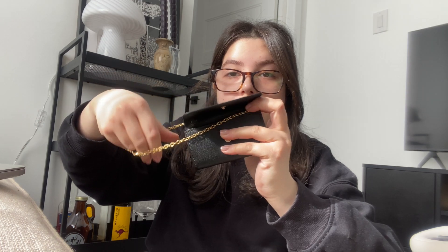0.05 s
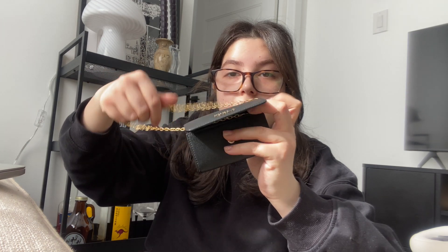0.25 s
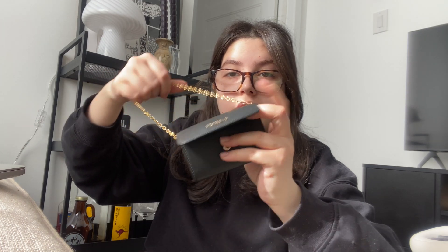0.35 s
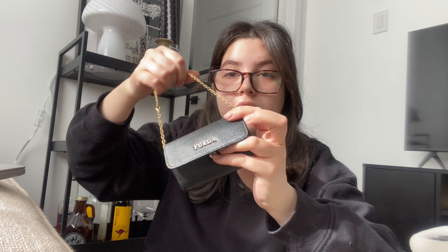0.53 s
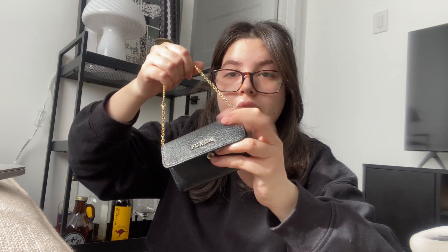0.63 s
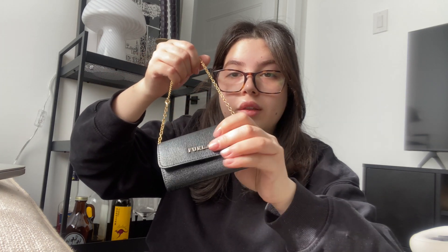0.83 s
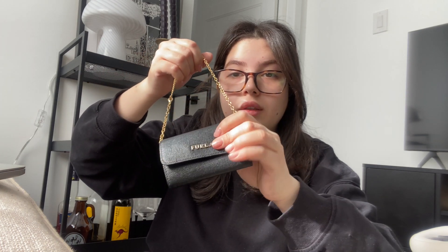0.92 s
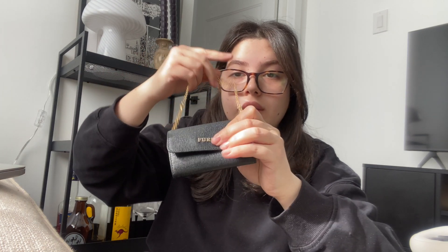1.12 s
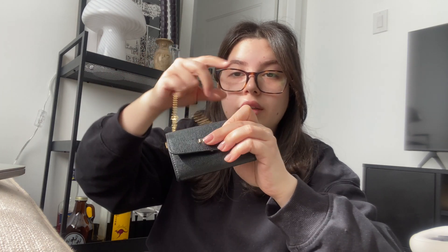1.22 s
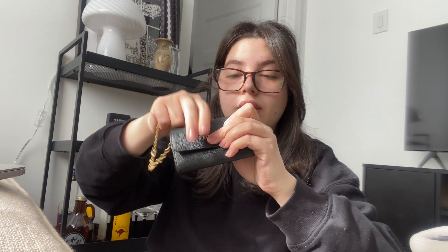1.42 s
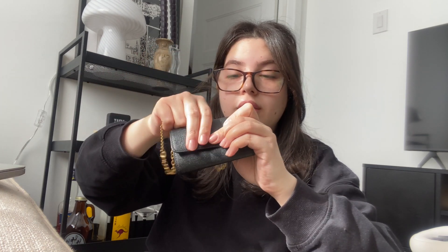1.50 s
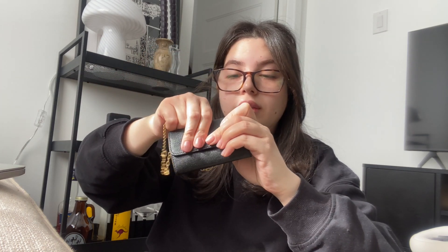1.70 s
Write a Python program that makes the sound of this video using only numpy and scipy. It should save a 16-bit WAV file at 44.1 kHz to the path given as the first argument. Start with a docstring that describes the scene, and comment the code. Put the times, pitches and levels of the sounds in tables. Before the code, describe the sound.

A small leather purse with a thin chain is handled up close, snapping twice amid light clinks

```python
"""A thin chain is pulled through a small leather wallet close to a stereo microphone pair in a quiet room.
Links knock and tick on stiff leather and a clasp snaps twice: blows and noisy scrapes ring short resonances.
Between the knocks the chain rustles, as noise shaped by many tiny contacts; dull thuds come from the hand.
The wallet rings narrowly, the room answers briefly with fading noise, and a low, unsteady rumble lies under hiss."""
import sys
import numpy as np
from scipy import signal
from scipy.fft import rfft, irfft, next_fast_len
from scipy.io import wavfile

SR = 44100
rng = np.random.default_rng(int(sys.argv[2]) if len(sys.argv) > 2 else 0)


def transcribe(signal):
    """Save signal, clipped to [-1, 1], as a 16-bit WAV file at the path in sys.argv[1]."""
    frames = np.atleast_2d(signal).T
    limited = np.clip(frames, -1, 1)
    pcm = np.round(limited * 32767).astype(np.int16)
    wavfile.write(sys.argv[1], SR, pcm)


N = 77175
SIDES = np.array([[.5], [-.5]])  # half of each left-right difference goes to either side


def amp(db):
    """dB to gain."""
    return 10 ** (np.asarray(db) / 20)


def unit(x):
    """Scaled to rms 1."""
    return x / np.sqrt(np.mean(x ** 2) + 1e-20)


def peaked(x):
    """Scaled to a peak of 1."""
    return x / abs(x).max()


def along(points, hz):
    """Values of (Hz, value) points, read on a log frequency axis."""
    f, v = np.transpose(points)
    return np.interp(np.log(hz + 1), np.log(f + 1), v)


def over_time(points):
    """Values of (s, value) points at every sample."""
    return np.interp(np.arange(N) / SR, *np.transpose(points))


def filtered(x, response, size=N):
    """x times a complex response of frequency."""
    m = next_fast_len(2 * size)
    return irfft(rfft(x, m) * response(np.fft.rfftfreq(m, 1 / SR)), m)[..., :size]


def causal(points):
    """Minimum-phase impulse response of a (Hz, dB) colour, by folding its cepstrum."""
    size = 2 ** 10
    cepstrum = irfft(np.log(amp(along(points, np.fft.rfftfreq(size, 1 / SR)))), size)
    cepstrum[1:size // 2] *= 2
    cepstrum[size // 2 + 1:] = 0
    return irfft(np.exp(rfft(cepstrum)), size)[:size // 2]


def resonance(f, hz, q):
    """Response of one damped resonance."""
    return 1j * f * hz / q / (hz * hz - f * f + 1j * f * hz / q)


def hiss():
    """Microphone hiss over an unsteady room rumble: noise whose left-right likeness falls with frequency."""
    # colour of the floor: hz, relative level_db
    floor_colour = [(20, -16.5), (40, -0.5), (65, 5.5), (110, -8.5), (300, -17), (700, -23), (1150, -28.5),
                    (1500, -31), (2000, -34), (5000, -32.5), (9000, -41), (15000, -44.5), (15500, -59.5),
                    (15750, -106.5)]
    # likeness of left and right: hz, correlation
    likeness = [(60, 0.62), (1500, 0.1), (3000, 0.033)]
    # level of the unsteady rumble, used around its mean: time_s, level_db
    rumble_level = [(0.0, -52.5), (0.18, -63), (0.57, -55), (0.594, -67.5), (0.808, -54.5), (0.954, -67.5),
                    (1.09, -57), (1.7, -60.5), (1.75, -66.5)]
    floor_db, rumble_top_hz = -56.5, 110

    def mid_and_side(hz):
        turn = np.arccos(np.clip(along(likeness, hz), -1, 1)) / 2
        return amp(along(floor_colour, hz)) * [np.cos(turn), np.sin(turn)]

    mid, side = filtered(rng.standard_normal((2, N)), mid_and_side)
    floor = amp(floor_db) * unit(np.array([mid + side, mid - side]))
    rumble = filtered(floor, lambda hz: hz < rumble_top_hz)
    level_db = over_time(rumble_level)
    return floor - rumble + amp(level_db - level_db.mean()) * rumble


def room(x):
    """Each frequency of the room's answer dies at its own speed; each stretch gets a newly drawn noise tail."""
    # reverberation time: hz, t60_s
    fade_times = [(200, 0.28), (1000, 0.26), (3000, 0.22), (8000, 0.28), (15000, 0.17)]
    stretch_s, delay_s = .09, 0.0046
    step, delay = round(stretch_s * SR), round(delay_s * SR)
    out = np.zeros((2, N + SR))
    for start in range(0, N, step):
        noise = rng.standard_normal((2, SR // 3))
        hz, t, spectrum = signal.stft(noise, SR, nperseg=256)
        fade = amp(-60 * t / along(fade_times, hz)[:, None])
        tail = signal.istft(spectrum * fade, SR, nperseg=256)[1]
        tail /= np.linalg.norm(tail[0])
        wet = signal.fftconvolve(x[None, start:start + step], tail, axes=1)
        out[:, start + delay:][:, :wet.shape[1]] += wet
    return out[:, :N]


def thuds():
    """The wallet in the hand: a blow and a short rough push into a well-damped low resonance."""
    # dull thuds, peaks before the stereo balance: start_s, peak_db, pitch_hz
    thud_list = [(0.233, -39, 490), (0.3582, -36.5, 440), (0.37, -41.5, 250), (0.3874, -34, 510),
                 (0.479, -51.5, 350), (0.784, -30, 417), (.78, -36, 109), (1.087, -44.5, 586),
                 (1.357, -38.5, 587), (1.376, -41.5, 420)]
    sharpness_q, push_fall_ms, blow = 1.15, 13, 16.6
    size = 4096
    out = np.zeros(N + size)
    fall = np.exp(-np.arange(size) / (push_fall_ms * SR / 1000))
    for s, db, hz in thud_list:
        push = fall * rng.standard_normal(size)
        push[0] = blow
        # the resonance, dulled above twice its pitch
        body = lambda f: resonance(f, hz, sharpness_q) / (1 + 1j * f / (2 * hz))
        out[round(s * SR):][:size] += amp(db) * peaked(filtered(push, body, size=size))
    return out[:N]


def rustle():
    """The chain sliding over the leather: many tiny link contacts of uneven size over a smooth rub."""
    # sliding, levels before ring and stereo balance: time_s, body_level_db, treble_level_db
    slide = [(0, -53, -74), (0.062, -84, -85.5), (0.16, -52, -66), (.2, -43.5, -60), (.28, -61.5, -76),
             (0.352, -52, -72.5), (.45, -57.5, -63.5), (.48, -43, -55.5), (.53, -55, -67.5),
             (.56, -70, -98), (0.65, -68.5, -78.5), (0.683, -52, -51), (.71, -68, -59), (0.748, -57, -64),
             (0.78, -37, -45), (.8, -49, -60), (0.921, -70.5, -75.5), (1.019, -83.5, -74.5),
             (1.09, -57, -69), (1.12, -57.5, -70.5), (1.251, -62.5, -67), (1.28, -75, -81),
             (1.329, -66.5, -75.5), (1.369, -39.5, -59.5), (1.439, -60, -80), (1.478, -52.5, -57.5),
             (1.52, -68.5, -73), (1.592, -55.5, -75), (1.66, -75.5, -77.5)]
    # colour of the leather body: hz, relative level_db
    body_colour = [(350, -9.5), (700, -15.5), (1200, -5), (1600, 2.5), (2200, -3), (3000, -2),
                   (5000, -12.5), (9000, -36.5)]
    # colour of the treble: hz, relative level_db
    treble_colour = [(2000, -61.5), (3500, -15.5), (6000, 17.5), (8000, 13.5), (11000, 15), (15300, 12.5),
                     (16200, -20)]
    grains_per_s, mean_boost_db, grain_fall_ms, smooth_db = 730, 4.5, 8, -5
    shut_s, shut_pitch = 1.28, 0.76  # pressed shut, the leather rustles lower

    sizes = amp(mean_boost_db * rng.exponential(size=N))
    hits = (rng.random(N) < grains_per_s / SR) * sizes
    grain = np.exp(-np.arange(256) / (grain_fall_ms * SR / 1000))  # cut off after 256 samples
    contact = unit(np.convolve(hits, grain)[:N]) + amp(smooth_db)

    def rubbed(colour):
        return unit(np.convolve(contact * rng.standard_normal(N), causal(colour))[:N])

    open_body = rubbed(body_colour)
    shut_body = rubbed(np.multiply(body_colour, [shut_pitch, 1]))
    body = np.where(np.arange(N) / SR < shut_s, open_body, shut_body)
    s, body_db, treble_db = np.transpose(slide)
    body_gain = amp(over_time(np.transpose([s, body_db])))
    treble_gain = amp(over_time(np.transpose([s, treble_db])))
    return body_gain * body + treble_gain * rubbed(treble_colour)


def taps():
    """Clean taps of single links: an impulse through two equal damped resonances in a row."""
    # taps, peaks before ring and stereo balance: start_s, peak_db, pitch_hz
    tap_list = [(.01, -40.5, 1820), (0.181, -38.5, 1450), (.187, -39, 1710), (0.2109, -29.5, 1380),
                (0.2139, -32, 1800), (0.2328, -28.5, 1400), (.261, -37.5, 1600), (0.325, -37, 1800),
                (0.3555, -43, 850), (.357, -32.5, 1450), (0.3915, -6.5, 1650), (0.738, -45.5, 1551),
                (0.7847, -18.5, 1617), (.913, -51.5, 1516), (1.0298, -53.5, 1586), (1.036, -39.5, 1656),
                (1.0587, -48, 1590), (1.074, -51, 1480), (1.081, -38, 1920), (1.09, -36, 1400),
                (1.095, -38.5, 1570), (1.3458, -38, 990), (1.3566, -21.5, 1314), (1.365, -30, 1900),
                (1.368, -38, 1140), (1.376, -30, 1360), (1.379, -35, 1630), (1.383, -38, 1105),
                (1.3867, -35, 1200), (1.394, -40, 1150), (1.547, -41.5, 1260), (1.5755, -47, 1800),
                (1.587, -44, 1070), (1.593, -44.5, 2200)]
    sharpness_q, size = 3.07, 2048
    out = np.zeros(N + size)
    for s, db, hz in tap_list:
        tap = filtered(signal.unit_impulse(size), lambda f: resonance(f, hz, sharpness_q) ** 2, size=size)
        out[round(s * SR):][:size] += amp(db) * peaked(tap)
    return out[:N]


def scrape(length_ms, tail_ms, blow, size):
    """A blow, then a rough contact that holds for its length and dies; long scrapes start softer."""
    ms = np.arange(size) * 1000 / SR
    force = np.exp(-np.maximum(ms - length_ms, 0) / tail_ms) * rng.standard_normal(size)
    force[0] = blow / max(length_ms, .5)
    return force


def knocks():
    """Each link contact rings the leather at its own pitch, with upper leather, hard edge and metal sparkle."""
    # knocks and ticks, peaks of each part before ring and stereo balance:
    # start_s, leather_db, leather_pitch_hz, upper_leather_db, hard_edge_db, metal_sparkle_db, scrape_ms
    knock_list = [(0.083, -53, 2410, -41, -57, -80, 0.39), (0.172, -34, 1900, -39, -46, -67, 4.1),
                  (0.19, -31, 1457, -33, -45, -63, 1.03), (0.2305, -18.5, 2085, -25.5, -28, -47, 1.23),
                  (0.2438, -30.5, 2090, -47, -38.5, -63, 0.39), (0.3648, -26.5, 2080, -48, -54, -44, 2.8),
                  (0.3839, -21.5, 1740, -33, -33, -30, 1.1), (0.388, -6.5, 2660, -37, -16, -30, 0.18),
                  (0.3884, -15, 1355, -18, -49, -36, 3.22), (0.4082, -32, 1800, -39, -37, -50, 1.9),
                  (0.476, -30, 1880, -36, -39.5, -37, 4.5), (0.4831, -40, 1650, -31, -41, -39, 2.5),
                  (0.5053, -30.5, 1860, -35, -56, -49, 0.73), (0.519, -38, 1730, -44, -49, -42, 1.8),
                  (0.68, -34.5, 1980, -31, -47, -38, 0.64), (0.6847, -32.5, 2030, -31, -33.5, -22, 7.14),
                  (0.779, -23, 1950, -22.5, -22, -30, 1.1), (0.7826, -16, 1676, -10, -8, -18, 1.08),
                  (0.798, -31, 1520, -55, -53, -36.5, 5.6), (1.0827, -34, 1520, -36.5, -39, -71, 3),
                  (1.092, -42, 1900, -40, -42.5, -81, 2.4), (1.128, -39.5, 1650, -59, -35, -75, 0.84),
                  (1.158, -52, 1470, -71, -41, -70, 2.7), (1.186, -53, 1530, -49, -46, -63, 2.5),
                  (1.197, -53, 1520, -67, -45, -73, 1.3), (1.2236, -48.5, 1336, -45, -34.5, -31, 1.3),
                  (1.237, -49, 1320, -36, -32, -54, 0.45), (1.242, -57, 1250, -49, -42, -43.5, 2),
                  (1.3556, -28.5, 2400, -28.5, -37, -45, 2.8), (1.3721, -25, 2140, -55, -40, -68, 3.4),
                  (1.451, -48.5, 1220, -66, -53, -49.5, 4.2), (1.474, -56, 1230, -45, -71, -60, 9),
                  (1.48, -43.5, 1057, -41, -43, -44.5, 5.9), (1.551, -50, 1740, -45.5, -47.5, -55, 1.04),
                  (1.584, -38, 1970, -44.5, -75.5, -76, 4.1)]
    # colour of the upper leather: hz, relative level_db
    upper_colour = [(1200, -20), (2200, -6), (2750, -2.5), (4400, -2), (6000, -34)]
    # colour of the hard edge: hz, relative level_db
    edge_colour = [(2500, -28), (4600, 10.5), (6300, 6.5), (7800, -3), (8700, 8.5), (11000, -21.5)]
    # colour of the metal sparkle: hz, relative level_db
    sparkle_colour = [(7000, -65), (9500, -14), (11500, -5), (13500, -12.5), (15400, -6.5), (16900, -13)]
    leather_q, size = 1.66, 2048
    out = np.zeros(N + size)
    upper, edge, sparkle = causal(upper_colour), causal(edge_colour), causal(sparkle_colour)
    for s, leather_db, hz, upper_db, edge_db, sparkle_db, ms in knock_list:
        soft = scrape(ms, tail_ms=0.93, blow=4.3, size=size)
        hard = scrape(ms, tail_ms=1, blow=11.1, size=size)  # drives both upper leather and edge
        metal = scrape(ms, tail_ms=1, blow=1.4, size=size)
        leather = filtered(soft, lambda f: resonance(f, hz, leather_q) ** 2, size=size)
        sound = amp(leather_db) * peaked(leather)
        sound += amp(upper_db) * peaked(np.convolve(hard, upper)[:size])
        sound += amp(edge_db) * peaked(np.convolve(hard, edge)[:size])
        sound += amp(sparkle_db) * peaked(np.convolve(metal, sparkle)[:size])
        out[round(s * SR):][:size] += sound
    return out[:N]


def hollow(x):
    """The contacts plus the narrow ring they set off in the hollow wallet."""
    # how freely it rings in the grip: time_s, gain_db
    grip = [(0.419, -34), (.6, 13.5), (0.781, -8), (1, 8), (1.2, -0.5), (1.28, -43)]
    ring_hz, ring_q = 1520, 17.7
    ring = filtered(amp(over_time(grip)) * x, lambda hz: resonance(hz, ring_hz, ring_q))
    return x + ring


def scene():
    """The close wallet reaches the left microphone a little earlier; room and floor surround it."""
    # stereo balance of the wallet: hz, left_over_right_db
    balance = [(60, -8.5), (300, 7.5), (1500, 0), (3000, 2.5), (5500, 4.6), (7800, -4)]
    lead_s, late_lead_s, moves_s = 0.00014, 0.00011, .62  # the left lead shrinks once the wallet moves
    room_db = -13.5
    near = hollow(knocks() + taps() + rustle()) + thuds()

    def at_pair(lead):
        level = lambda hz: amp(SIDES * along(balance, hz))
        return filtered(near, lambda hz: level(hz) * np.exp(2j * np.pi * hz * lead * SIDES))

    direct = np.where(np.arange(N) < moves_s * SR, at_pair(lead_s), at_pair(late_lead_s))
    return direct + amp(room_db) * room(near) + hiss()


def record(dry):
    """Two channels below the top treble, the left signal turned in phase for both above it, then a band limit."""
    # phase turn between the sides in the top treble: hz, left_lead_radians
    treble_turn = [(9000, 3.3), (9900, 4), (11000, 0), (13000, 1.05), (14200, -5.5), (15800, -2)]
    # the microphone's top end: hz, gain_db
    roll_off = [(15600, 0), (16000, -10), (16700, -18), (17000, -55)]
    shared_hz, shared_width_hz, top_hz = 8300, 180, 17100
    shared = lambda hz: (1 + np.tanh((hz - shared_hz) / shared_width_hz)) / 2
    low = filtered(dry, lambda hz: 1 - shared(hz))
    top = filtered(dry[0], lambda hz: shared(hz) * np.exp(1j * SIDES * along(treble_turn, hz)))
    return filtered(low + top, lambda hz: (hz < top_hz) * amp(along(roll_off, hz)))


dry = scene()
out = record(dry)
transcribe(out)
```